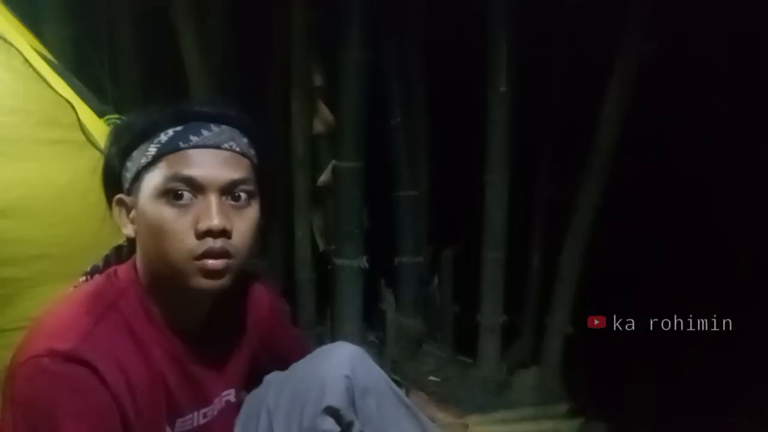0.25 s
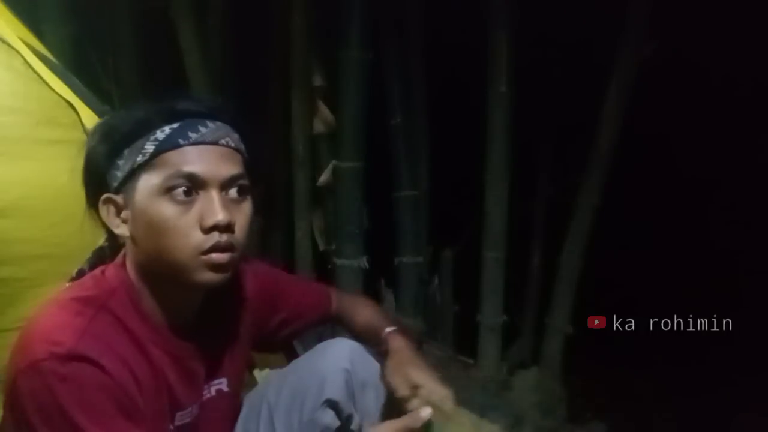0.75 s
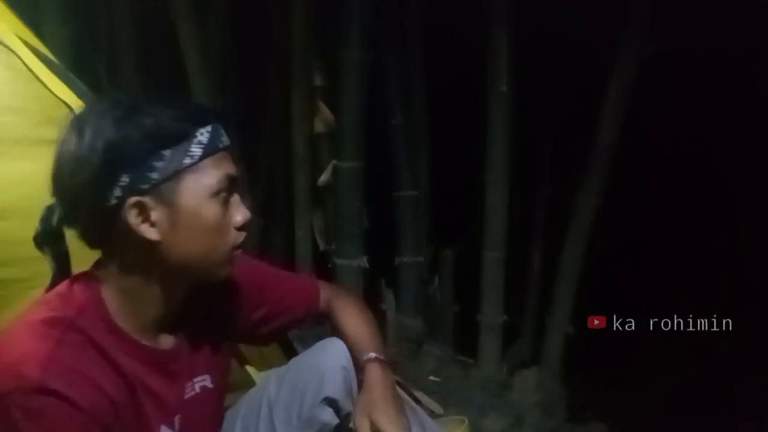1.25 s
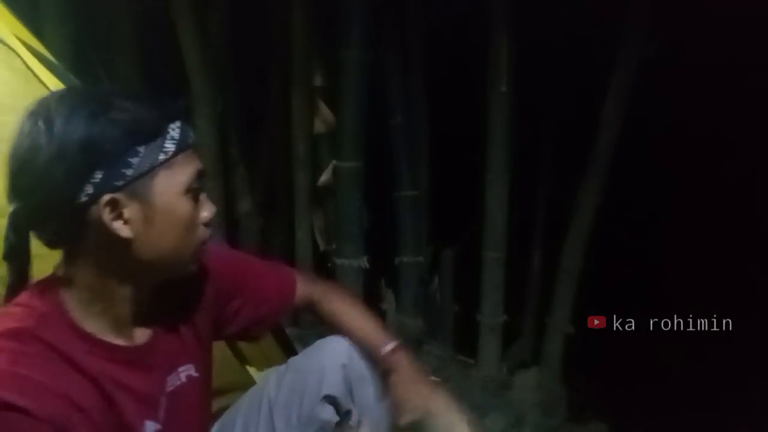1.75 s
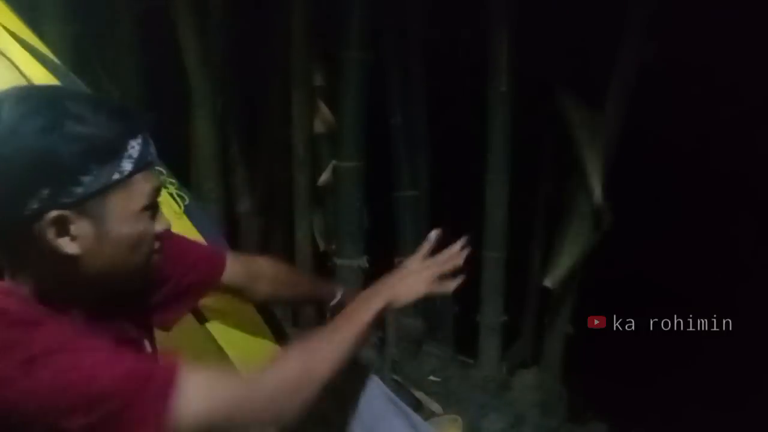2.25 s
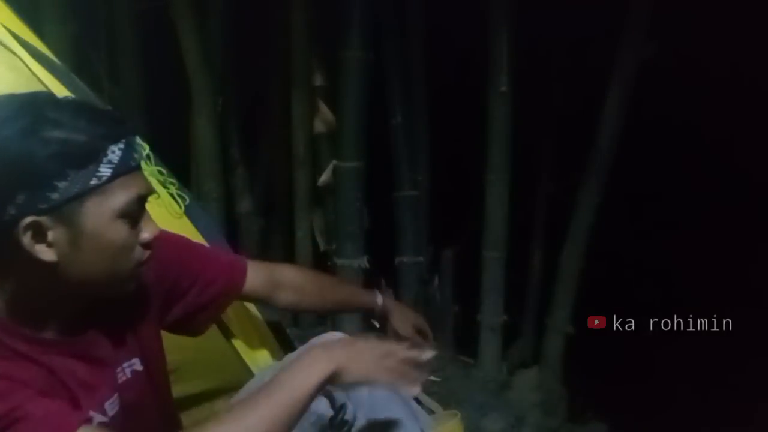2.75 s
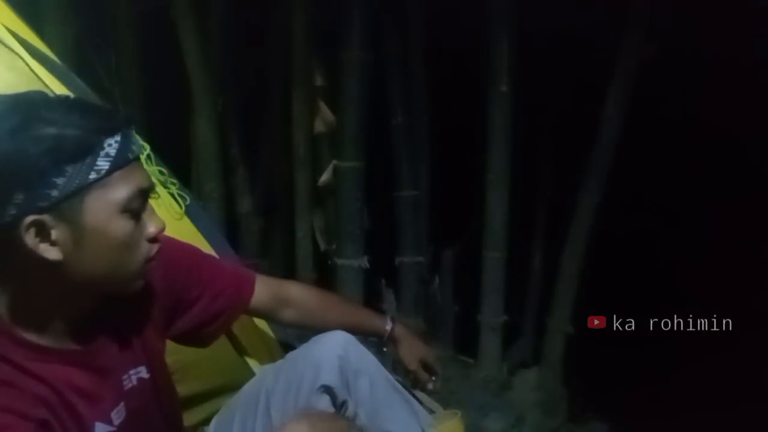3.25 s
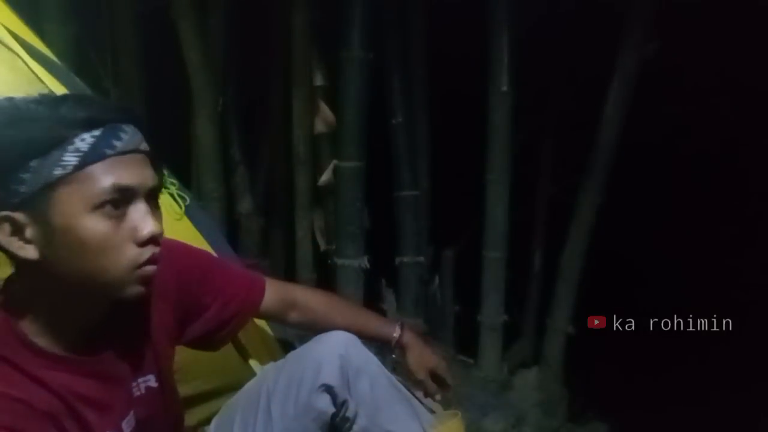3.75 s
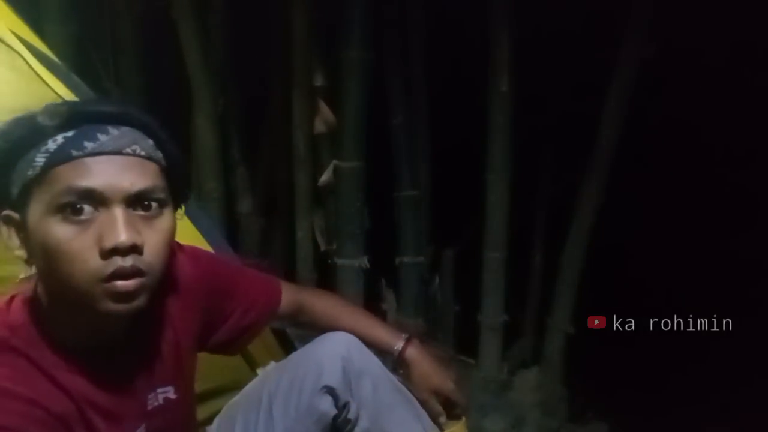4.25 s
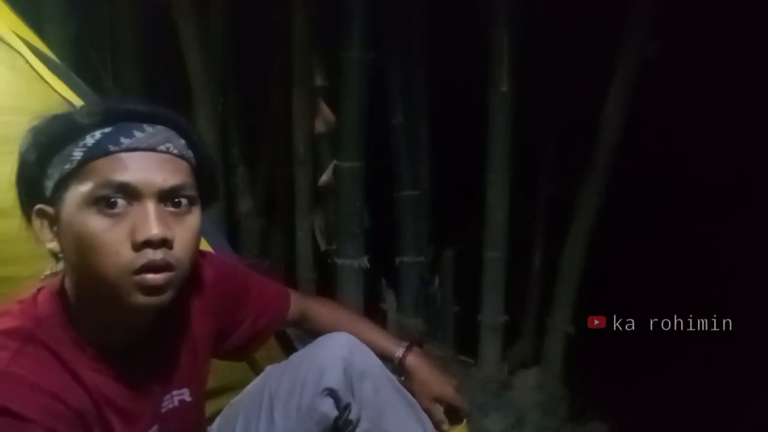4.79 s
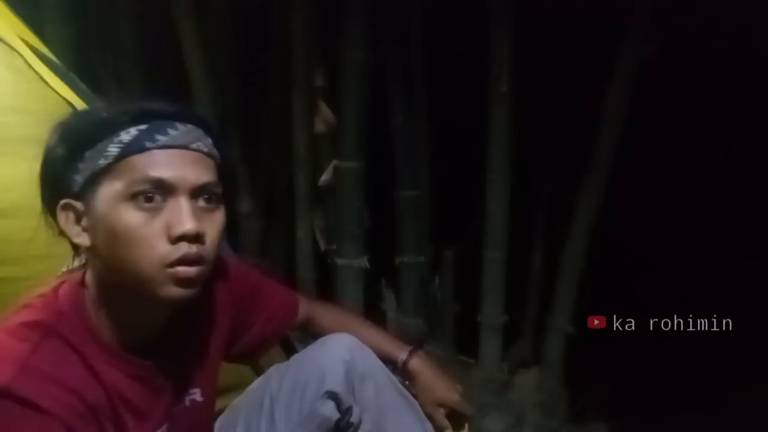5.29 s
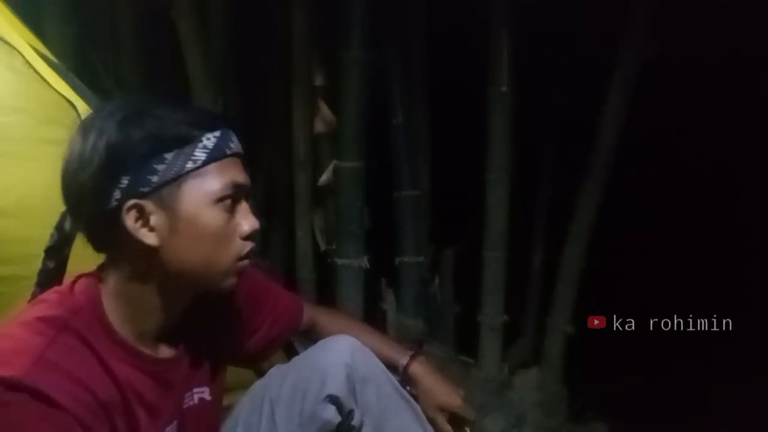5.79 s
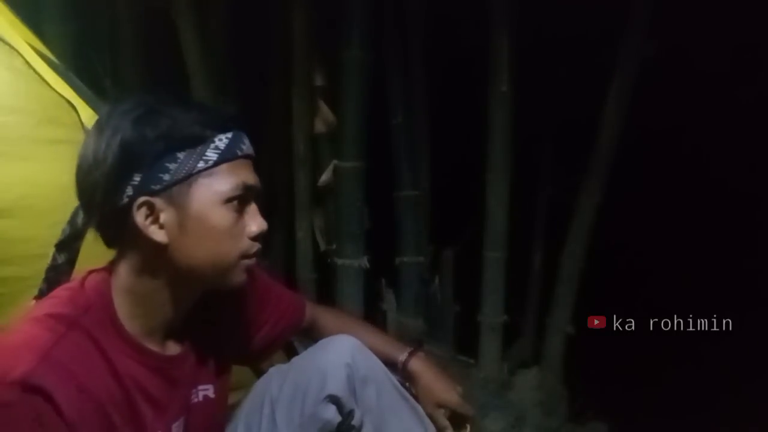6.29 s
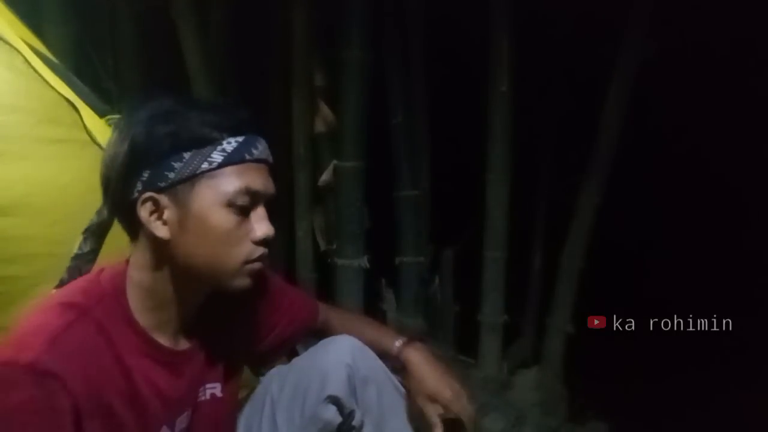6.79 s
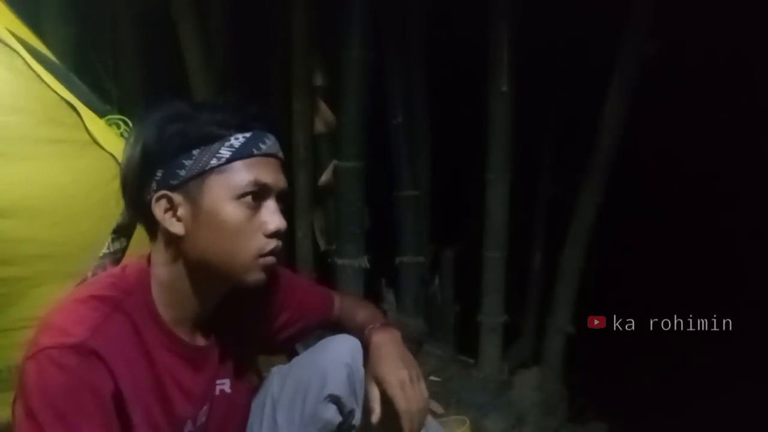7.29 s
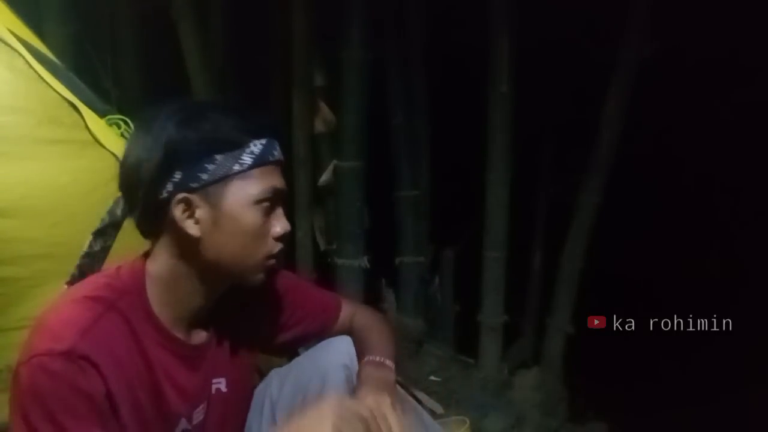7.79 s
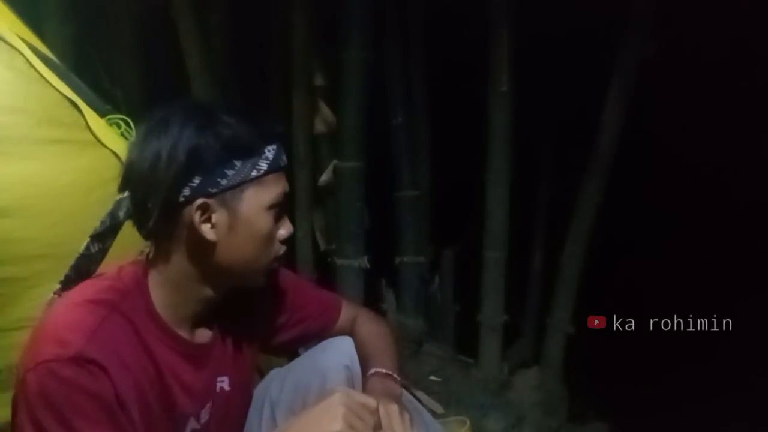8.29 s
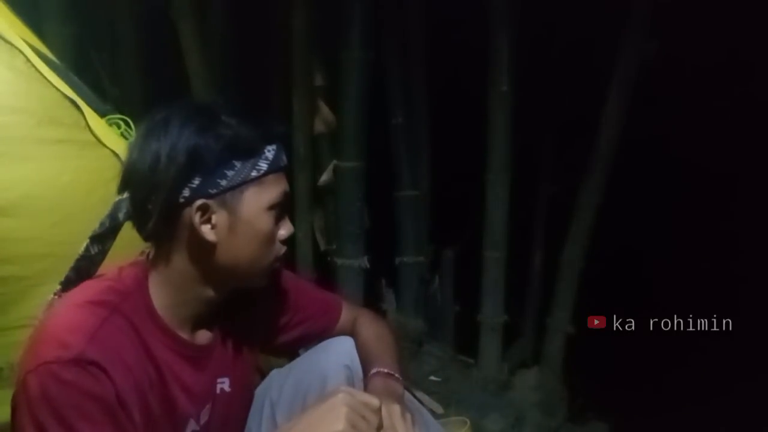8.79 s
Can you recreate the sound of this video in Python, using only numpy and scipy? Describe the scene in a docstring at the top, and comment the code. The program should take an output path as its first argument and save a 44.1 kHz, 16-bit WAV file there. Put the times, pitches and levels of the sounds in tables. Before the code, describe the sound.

Fast rattling night caller and steady crickets swell and pause, interrupted once by tossed bamboo clacking sharply, with a faint broken bird whistle afterward.

```python
"""A fast rattling caller, quick pips and crickets are heard first, over murmuring water, at night in a bamboo thicket.
A thrown piece of bamboo brushes the stems and lands with a clack, among soft bumps, scuffs and ticks.
Far off, a bird gives a long, broken whistle. Insects are trains of short tones, one for each wing stroke.
Bamboo is bursts of noise with ringing tones, bumps are sinking tones, and water, air and cloth are shaped noise."""
import sys
import numpy as np
from scipy import signal
from scipy.fft import rfft, irfft, next_fast_len
from scipy.io import wavfile

SR = 44100
rng = np.random.default_rng(int(sys.argv[2]) if len(sys.argv) > 2 else 0)


def transcribe(signal):
    """Save signal, clipped to [-1, 1], as a 16-bit WAV file at the path in sys.argv[1]."""
    frames = np.atleast_2d(signal).T
    limited = np.clip(frames, -1, 1)
    pcm = np.round(limited * 32767).astype(np.int16)
    wavfile.write(sys.argv[1], SR, pcm)


N = 398663
TIME = np.arange(N) / SR
# sound scattered by the stems, compared with the direct sound, for close and distant callers
CLOSE_WET_DB, FAR_WET_DB = -17, -7.5


def from_db(db):
    """Turn decibels into a plain gain."""
    return 10 ** (np.asarray(db) / 20)


def rms_one(x):
    """Scale a signal to an average strength (rms) of 1."""
    return x / np.sqrt(np.mean(x ** 2) + 1e-20)


def seconds(length):
    """The time of each sample in a sound of this length."""
    return np.arange(int(length * SR)) / SR


def evenly(first, last, per_s):
    """Equally spaced times from first to last, at about this rate."""
    return np.linspace(first, last, round((last - first) * per_s) + 1)


def add(track, s, sound):
    """Mix a sound in from time s."""
    start = max(int(s * SR), 0)
    part = sound[:max(N - start, 0)]
    track[start:start + len(part)] += part


def sine(hz):
    """A pure tone that follows a changing pitch, from a random starting phase."""
    return np.sin(2 * np.pi * (np.cumsum(hz) / SR + rng.random()))


def low_pass(x, hz):
    """Soften everything above a cut-off pitch."""
    return signal.sosfilt(signal.butter(2, min(hz, .45 * SR), fs=SR, output="sos"), x)


def noise(spectrum):
    """Noise of a given colour, rms 1: random sound with each pitch range weighted."""
    hz, db = np.transpose(spectrum)
    size = next_fast_len(N)
    bins = np.arange(size // 2 + 1) * SR / size
    weight_db = np.interp(np.log(bins + 1), np.log(hz), db, left=-100, right=-100)
    white = rfft(rng.standard_normal(size))
    return rms_one(irfft(white * from_db(weight_db), size)[:N])


def wide(spectrum, side_db):
    """Stereo noise: a common part and a part with opposite signs in the two ears."""
    common = noise(spectrum)
    return common + from_db(side_db) * noise(spectrum) * [[1], [-1]]


def scattered(x, t60):
    """Sound thrown back by the surrounding stems: many random echoes that fade by 60 dB in t60 s."""
    t = seconds(t60)
    echoes = rng.standard_normal(len(t)) * from_db(-60 * t / t60)
    return signal.oaconvolve(x, echoes / np.linalg.norm(echoes))[:N]


def ahead(x, wet_db, t60):
    """A source straight in front, with its scatter, alike in both ears."""
    return x + scattered(x, t60) * from_db(wet_db)


def place(x, pan_db, lead_ms, wet_db, t60=.25, scatter_side_db=-12):
    """A source with its own level and arrival time at each ear, and scatter from all round."""
    heard = ahead(x, wet_db, t60)
    right = np.interp(TIME - lead_ms / 1000, TIME, heard)
    ears = np.array([heard, right]) * from_db([[pan_db / 2], [-pan_db / 2]])
    # a further part of the scatter differs between the ears
    return ears + from_db(wet_db + scatter_side_db) * scattered(x, t60) * [[1], [-1]]


def stroke(hz, length, fall):
    """One wing stroke: a tone that swells and fades while its pitch sinks (rises if fall is negative)."""
    u = seconds(length) / length
    return np.sin(np.pi * u) ** 0.46 * sine(hz * (1 + fall * (1 / 3 - u ** 2)))


def cricket(chirps, hz, strokes_per_s, duty, fall, jitter=0.0035):
    """Each chirp is a train of slightly uneven wing strokes, on average strongest in the middle."""
    out = np.zeros(N)
    for s, length, db in chirps:
        count = max(round(length * strokes_per_s), 1)
        for k, (late, sharp, loud) in enumerate(rng.standard_normal((count, 3))):
            gain = from_db(db + loud) * np.sin(np.pi * (k + .5) / count) ** 0.097
            start = s + (k + .03 * late) / strokes_per_s
            add(out, start, gain * stroke(hz * (1 + jitter * sharp), duty / strokes_per_s, fall))
    return out


def bouts(rows, length):
    """Spread chirps evenly through each bout."""
    return [(s, length, db) for first, last, rate, db in rows for s in evenly(first, last, rate)]


# colours of the water, the far insects and the hiss: pitch_hz, relative level_db (power per Hz)
RIVER = [(25, -24), (60, -15.5), (90, -10), (150, -11.5), (260, -18), (450, -21), (2200, -25), (3000, -61)]
CHORUS = [(2150, -29), (2450, -3.5), (2620, -16), (2850, -6), (3400, -4), (3800, -11), (4500, -1.5),
          (4850, -8), (5300, -7), (6200, -9.5), (7200, -24.5)]
HISS = [(2000, -7), (6500, -5), (7300, -6), (7750, 0.5), (8700, 1), (9250, -4.5), (10200, 3), (10900, 2.5),
        (11300, -1), (13000, -2), (13900, -10), (15400, -2.5)]
# how the hiss level moves: time_s, relative level_db
HISS_LEVELS = [(0.0, -61.5), (2.67, -61), (3.25, -66), (9.04, -62)]


def background(river_db=-63, chorus_db=-58.0, hiss_offset_db=1.5, rumble_db=-72, gust_db=5):
    """Shaped noise for water, the blend of countless far insects, a fine high hiss and lumps of moving air."""
    river = from_db(river_db) * wide(RIVER, side_db=-7)
    chorus = from_db(chorus_db) * wide(CHORUS, side_db=-4.0)
    hiss_db = np.interp(TIME, *np.transpose(HISS_LEVELS)) + hiss_offset_db
    hiss = from_db(hiss_db) * wide(HISS, side_db=-11.0)
    slow_drift = np.tanh(rms_one(low_pass(rng.standard_normal(N), 0.91)))
    air = from_db(rumble_db + gust_db * slow_drift) * wide([(15, -3), (70, -15)], side_db=3.5)
    return river + chorus + hiss + air


# long high trills: start_s, length_s, relative level_db, pitch_hz
TRILLS = [(0, 0.86, -58, 5170), (0.282, 0.19, -52.5, 5890), (1.098, .2, -58, 5590),
          (1.602, 0.21, -52, 5830), (2.32, 0.22, -56, 5790), (2.981, 0.22, -52.5, 5880),
          (3.051, 0.98, -59, 5250), (4.33, .19, -58, 5600), (4.534, 0.17, -52.5, 5930),
          (5.438, 0.32, -51.5, 5794), (6.221, 0.22, -59.5, 5830), (6.975, 0.2, -54, 5880),
          (7.486, 0.21, -57.5, 5630), (8.169, 0.21, -52, 5840)]
# bouts of the other far callers: first_chirp_s, last_chirp_s, chirps_per_s (about), relative level_db
BUZZER = [(.1, 2.21, 6, -50), (5.84, 6.6, 6, -53), (6.82, 8.14, 6, -49.5), (8.305, 8.995, 5.8, -48.5)]
LOW_TINKLER = [(2.62, 3.74, 5.3, -56), (5.48, 5.84, 5.5, -60)]
MID_TINKLER = [(0, .92, 5.5, -53.5), (3, 3.92, 5.4, -56.5), (5.63, 6.75, 5.4, -52.5),
               (8.385, 8.925, 5.5, -52)]
HIGH_TINKLER = [(.85, 1.57, 5.5, -53.5), (3.92, 4.83, 5.5, -58), (7.69, 8.41, 5.5, -59)]
THIN_TRILLER = [(2.87, 4.57, 1.77, -59), (5.17, 8.76, 1.68, -58.5)]
LISPER = [(1.77, 3.04, 4.7, -53.5), (7.88, 8.68, 5, -58)]


def far_crickets():
    """Trains of wing strokes, with pitches and stroke rates set for each kind of caller."""
    buzzer = cricket(bouts(BUZZER, .09), hz=5045, strokes_per_s=144, duty=.95, fall=.01, jitter=.01)
    low = cricket(bouts(LOW_TINKLER, .09), hz=5060, strokes_per_s=44, duty=0.7, fall=.01)
    mid = cricket(bouts(MID_TINKLER, .085), hz=5274, strokes_per_s=36, duty=0.725, fall=0.022, jitter=0.01)
    high = cricket(bouts(HIGH_TINKLER, .085), hz=5450, strokes_per_s=38, duty=0.92, fall=0.016)
    trills = sum(cricket([(s, length, db)], hz, strokes_per_s=57, duty=1.17, fall=0.013)
                 for s, length, db, hz in TRILLS)
    thin = cricket(bouts(THIN_TRILLER, 0.16), hz=6096, strokes_per_s=94, duty=0.68, fall=0.041)
    lisper = cricket(bouts(LISPER, .12), hz=11430, strokes_per_s=200, duty=0.99, fall=.015, jitter=.014)
    # caller, left minus right level in dB, left lead in ms
    seats = [(buzzer + lisper, .5, .03), (low + mid + high, 8, .03), (trills, 10, .043), (thin, -6, 0)]
    return sum(place(x, pan_db, lead_ms, FAR_WET_DB) for x, pan_db, lead_ms in seats)


# distant bird notes: start_s, length_s, relative level_db, pitch_hz, glide (rise as share of pitch)
BIRD_NOTES = [(4.164, .18, -61, 1003, 0.022), (4.351, 0.14, -55.5, 1050, .05), (4.48, 0.12, -65, 1082, 0),
              (4.649, 0.46, -56, 1070, -0.012), (4.74, .09, -60, 2310, 0), (5.129, .06, -58, 1060, 0),
              (5.25, .05, -63, 1052, 0), (6.98, .2, -63, 788, -0.026), (7.9, .09, -61, 2310, -.025)]


def bird(waver=0.006, flutter_db=2.5):
    """Nearly pure far notes that swell and fade, some gliding a little, blurred by the trees."""
    out = np.zeros(N)
    for s, length, db, hz, rise in BIRD_NOTES:
        u = seconds(length) / length
        wobble = waver * rms_one(low_pass(rng.standard_normal(len(u)), 40))
        pitch = hz * (1 + rise * (u - .5) + wobble)
        flutter = flutter_db * rms_one(low_pass(rng.standard_normal(len(u)), 20))
        add(out, s, from_db(db + flutter) * np.sin(np.pi * u) ** 0.58 * sine(pitch))
    return ahead(out, wet_db=-16.5, t60=0.13)


# the pipper's runs: first_pip_s, last_pip_s
PIP_RUNS = [(.013, .128), (.239, .465), (.582, .783), (.907, 1.14), (1.278, 1.507), (1.64, 1.836),
            (1.984, 2.175), (2.271, 2.5), (2.64, 2.862), (2.968, 3.165), (3.252, 3.48), (3.568, 3.797),
            (3.921, 4.124), (4.187, 4.428), (4.522, 4.776), (4.923, 5.13), (5.243, 5.474), (5.628, 5.8),
            (5.91, 6.108), (6.184, 6.455), (6.579, 6.806), (6.886, 7.149), (7.228, 7.45), (7.529, 7.758),
            (7.864, 8.135), (8.297, 8.495), (8.585, 8.829), (8.95, 9.15)]


def pips(hz=2790, level_db=-52, straggler_db=-55, mean_gap_s=.033, slowing=.13, straggler_wait_s=.05):
    """Single short strokes in runs that start quickly and slow down; a weaker one straggles after each run."""
    out = np.zeros(N)
    for first, last in PIP_RUNS:
        u = np.linspace(0, 1, round((last - first) / mean_gap_s) + 1)
        # gaps start shorter and end longer by the share "slowing"
        times = first + (last - first) * (u - slowing * u * (1 - u))
        run = [(s, level_db) for s in times] + [(last + straggler_wait_s, straggler_db)]
        for s, db in run:
            gain = from_db(db + rng.normal(0, 1))
            add(out, s - .004, gain * stroke(hz + rng.normal(0, 15), .0085, fall=.03))
    return place(out, pan_db=-1.0, lead_ms=-0.053, wet_db=FAR_WET_DB)


# cloth scuffs of a moving arm: start_s, length_s, relative level_db
SCUFFS = [(0.198, 0.087, -62), (1.87, .08, -59.5), (2.15, .05, -60.5), (2.249, 0.063, -52)]
# colour of the cloth noise: pitch_hz, relative level_db (power per Hz)
CLOTH = [(60, -4), (150, 0), (450, -4), (1000, -15), (2500, -24)]


def scuffs():
    """Cloth slides in short swells of noise, made grainy by quick random changes of level."""
    swells = np.zeros(N)
    for s, length, db in SCUFFS:
        add(swells, s, from_db(db) * np.sin(np.pi * seconds(length) / length))
    grain_db = 3 * rms_one(low_pass(rng.standard_normal(N), 80))
    return swells * noise(CLOTH) * from_db(grain_db)


# soft bumps close by: start_s, relative level_db, pitch_scale_hz (the pitch sinks from 1.56 to 0.69 times this)
BUMPS = [(.89, -22, 125), (1.902, -31, 105), (2.16, -43, 133), (2.266, -39.5, 174), (2.487, -29.5, 86),
         (2.975, -32.5, 167), (4.181, -44.5, 107), (4.256, -38, 141), (4.757, -44.5, 74)]


def bumps(t60=0.036, sag=0.87, weight_db=-12, weight_hz=75, weight_t60=.06):
    """Dull thuds of a few cycles that sag in pitch, over a steady low thump."""
    out, t = np.zeros(N), seconds(.15)
    for s, db, hz in BUMPS:
        pitch = hz * (0.69 + sag * np.exp(-t / 0.0076))
        swing = np.sin(2 * np.pi * np.cumsum(pitch) / SR) * from_db(-60 * t / t60)
        thump = np.sin(2 * np.pi * weight_hz * t) * from_db(weight_db - 60 * t / weight_t60)
        soft_start = 1 - np.exp(-t / 0.004)
        add(out, s, from_db(db + 9) * soft_start * (swing + thump))
    thuds = signal.sosfilt(signal.butter(2, [70, 480], "band", fs=SR, output="sos"), out)
    return ahead(thuds, wet_db=-9, t60=0.12)


# nearest cricket's bouts: first_chirp_s, last_chirp_s, chirp_length_s, relative level_db
NEAR = [(1.377, 1.377, .05, -43.5), (1.568, 2.411, .095, -42), (2.625, 2.843, .11, -41.3),
        (3.059, 4.351, .11, -41.8), (4.591, 5.049, .11, -42.5)]
# its neighbour of the same kind: first_chirp_s, last_chirp_s, chirps_per_s (about), relative level_db
NEIGHBOUR = [(.715, 2.09, 5.1, -52)]


def near_crickets(chirps_per_s=4.65, second_beat_s=.0068, second_db=-3.0):
    """Each stroke of the nearest one has two beats, the second shorter and lower; a neighbour has one."""
    chirps = [(s, length, db) for first, last, length, db in NEAR for s in evenly(first, last, chirps_per_s)]
    later = [(s + second_beat_s, length, db) for s, length, db in chirps]
    first_beats = cricket(chirps, hz=4540, strokes_per_s=64, duty=.62, fall=.004, jitter=.002)
    second_beats = cricket(later, hz=4430, strokes_per_s=64, duty=.45, fall=.01)
    nearest = first_beats + from_db(second_db) * second_beats
    neighbour = cricket(bouts(NEIGHBOUR, .095), hz=4434, strokes_per_s=62.5, duty=0.83, fall=.012)
    return (place(nearest, pan_db=9.0, lead_ms=0.032, wet_db=CLOSE_WET_DB)
            + place(neighbour, pan_db=-8, lead_ms=0, wet_db=FAR_WET_DB))


# phrases swell to a climax, then any later notes are the ending:
# start_s, climax_s, swell_time_s, swell_depth_db, relative ending_level_db
PHRASES = [(0, 1.98, 0.45, 14.5, -51.5), (3.5, 5.57, 0.86, 19.5, -49), (7.5, 9.35, .8, 20.5, -50)]


def rattle_effort(s, climax_db=-38, swell_shape=1.45, rest_hz=3147, lift_hz=100,
                  ending_hz=3370, ending_hz_per_s=180):
    """Level and pitch at time s: both rise toward the climax, then the level drops and the pitch steps up."""
    _, climax, swell_s, depth_db, ending_db = [row for row in PHRASES if row[0] <= s][-1]
    if s > climax:
        return ending_db, ending_hz + ending_hz_per_s * (s - climax)
    short_db = depth_db * (1 - np.exp(-((climax - s) / swell_s) ** swell_shape))
    return climax_db - short_db, rest_hz + lift_hz * from_db(-short_db)


# runs of rattle notes: first_note_s, last_note_s, notes_per_s (about)
RATTLE = [(.04, 1.847, 23.2), (1.894, 1.952, 18), (2.034, 2.281, 20), (2.34, 2.94, 18.5),
          (3.884, 4.671, 23), (4.715, 5.159, 22.5), (5.204, 5.532, 21.3), (5.61, 5.94, 18),
          (7.88, 9.026, 21)]


def rattle(gap_s=.0063, growth_db=4.0, lead_hz=170, final_length=0.011):
    """A note is three short, growing pulses and a longer, lower one."""
    out = np.zeros(N)
    for s in np.concatenate([evenly(*run) for run in RATTLE]):
        db, hz = rattle_effort(s)
        final = stroke(hz, final_length, fall=0.07)
        add(out, s - .004, from_db(db + 4.5) * final * from_db(np.linspace(0, -7, len(final))))
        for k in range(1, 4):  # counting back from the final pulse
            lead = stroke(hz + lead_hz + rng.normal(0, 88), 0.0047, fall=-0.13)
            lead_db = db + 4.0 - k * growth_db + rng.normal(0, 1.7)
            add(out, s - .003 - k * gap_s + rng.normal(0, .0005), from_db(lead_db) * lead)
    return place(out, pan_db=-3, lead_ms=-0.027, wet_db=CLOSE_WET_DB)


# bamboo knocks: start_s, relative level_db, hardness_hz (low-pass cut-off), relative ring_level_db
KNOCKS = [(1.031, -30.5, 3420, -11), (1.044, -33.5, 3400, -4.5), (1.617, -24, 3280, -19),
          (1.628, -31.5, 3200, -0.5), (2.4768, -4.5, 3500, -6.5), (2.4926, -3.5, 9000, -2),
          (2.5021, -4, 6700, -10.5), (2.856, -38.5, 2000, 8.5)]
# ringing tones of the hollow stick: pitch_hz, relative level_db, t60_s (time to fade by 60 dB)
STICK = [(517.5, -8.5, 0.32), (1233, -3, 0.065), (1360, 4.5, 0.11), (1630, -4, 0.12), (1825, -4.5, 0.1),
         (2020, -2, 0.09), (2300, 3, 0.09), (2370, 6, 0.085), (2640, 2, 0.064), (2860, 0, 0.06),
         (3160, 0, 0.081), (3470, 1, 0.09), (3645, -1, 0.072), (3920, 3, 0.085)]
# colour of the crack: pitch_hz, relative level_db (power per Hz)
CLACK = [(200, -25), (600, -14.5), (1050, -13.5), (1350, -2.5), (1600, -7), (2150, -3), (2400, 3),
         (3000, -2.5), (4050, -5), (4400, -23), (5000, -29), (6500, -10), (9300, -16.5), (10400, -5),
         (15500, -26)]
# dry splinters and leaves snapping: start_s, relative level_db, t60_s
SNAPS = [(.603, -43, .03), (.863, -45, .03), (2.4744, -6.5, 0.024), (2.4946, -5, 0.014),
         (2.765, -40.5, 0.058)]
# brushing through stems and litter: start_s, length_s, relative level_db
BRUSHES = [(1.591, 0.013, -37), (2.282, 0.0075, -39.5), (2.331, 0.023, -27.5), (2.516, .06, -33.5),
           (2.852, 0.056, -39)]


def bamboo(crack_t60=0.041, ring_db=-22, crack_db=-9, snap_db=-6, brush_db=-3):
    """Blows crack and set the hollow stick ringing; splinters snap; brushing is a hail of tiny blows."""
    out, t = np.zeros(N), seconds(.25)
    clack = noise(CLACK)
    splinter = noise([(1000, 4), (3000, 0), (6000, 2), (10500, 12), (15500, 8.5)])

    def excerpt(sound, s):
        """Take a short piece of noise starting at time s."""
        return np.roll(sound, -int(s * SR))[:len(t)]

    def blow(s, body_db):
        """One contact: a noisy crack and fading tones, each with a random strength and sign."""
        crack = excerpt(clack, s) * from_db(crack_db - 60 * t / crack_t60)
        ring = np.zeros(len(t))
        for hz, db, t60 in STICK:
            fade = from_db(db + rng.normal(0, 1.35) - 60 * t / t60)
            ring += fade * np.sin(2 * np.pi * hz * t) * rng.choice([-1, 1])
        return crack + from_db(ring_db + body_db) * ring

    for s, db, soft_hz, body_db in KNOCKS:
        add(out, s, from_db(db) * low_pass(blow(s, body_db), soft_hz))
    for s, db, t60 in SNAPS:
        add(out, s, excerpt(splinter, s) * from_db(db + snap_db - 60 * t / t60))
    for s, length, db in BRUSHES:
        for at in evenly(s, s + length, 300):
            gain = from_db(db + brush_db + rng.normal(0, 4.3))
            add(out, at + rng.uniform(0, 0.0022), gain * blow(at, -11.5))
    return ahead(out, wet_db=-17, t60=.34)


def scene():
    """All the sounds together, from the background to the bamboo."""
    surroundings = background() + far_crickets() + bird() + pips()
    close_by = scuffs() + bumps() + near_crickets() + rattle() + bamboo()
    return surroundings + close_by


def record(dry, cutoff_hz=15600):
    """The highest peaks are rounded and the top is cut steeply."""
    rounded = .5 * np.tanh(dry / .5)
    return signal.sosfilt(signal.ellip(10, .1, 80, cutoff_hz, fs=SR, output="sos"), rounded)


dry = scene()
out = record(dry)
transcribe(out)
```